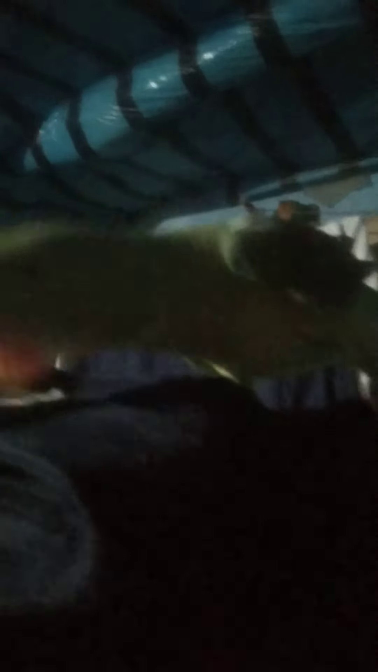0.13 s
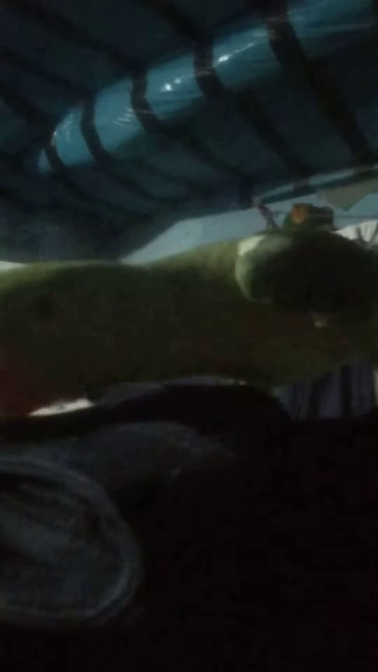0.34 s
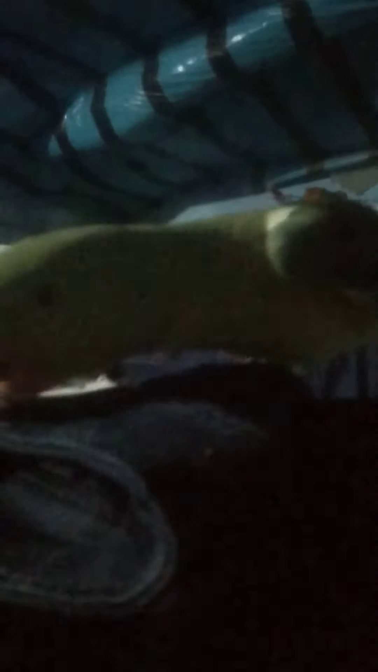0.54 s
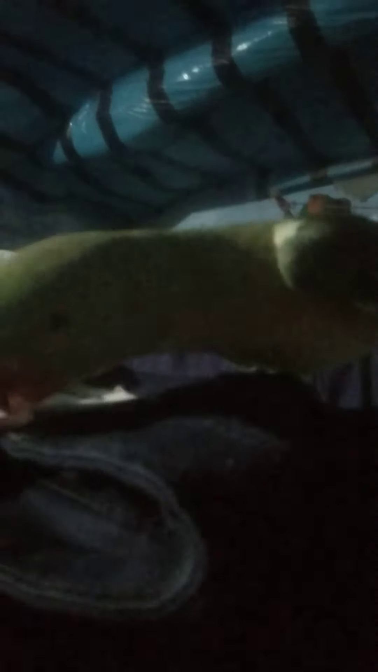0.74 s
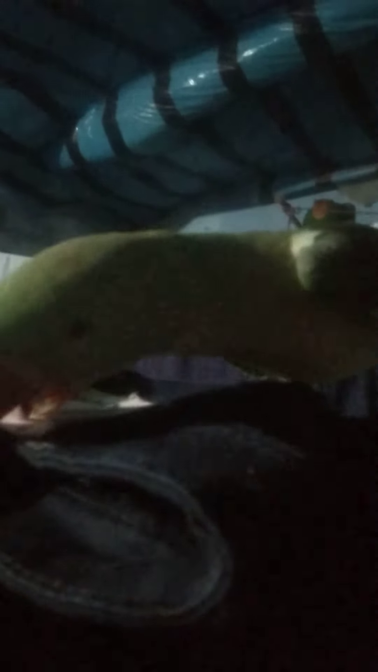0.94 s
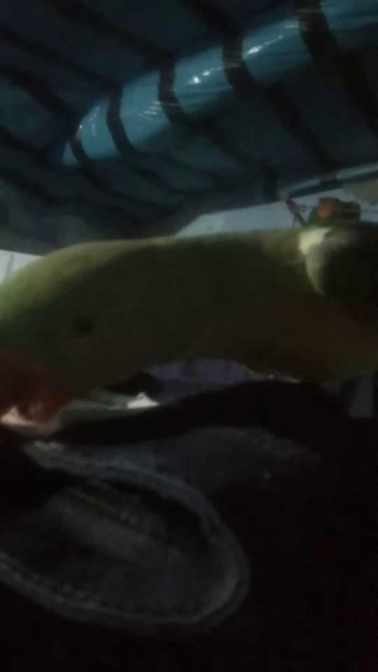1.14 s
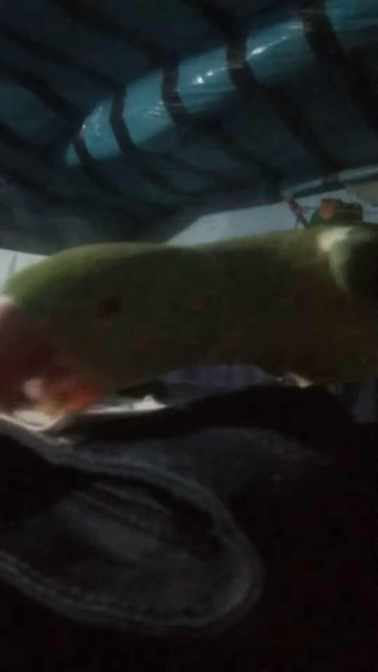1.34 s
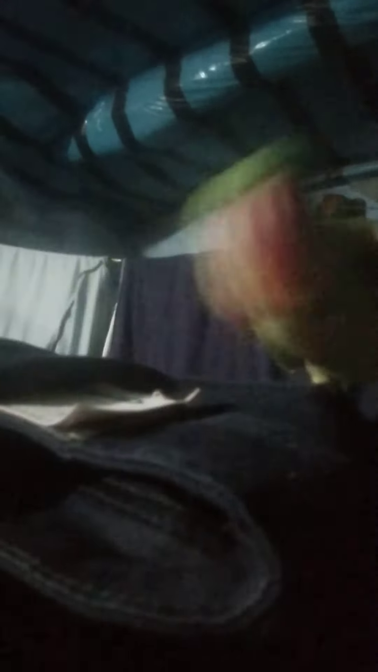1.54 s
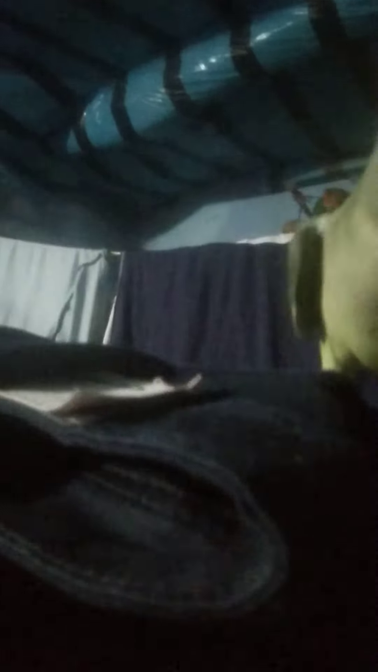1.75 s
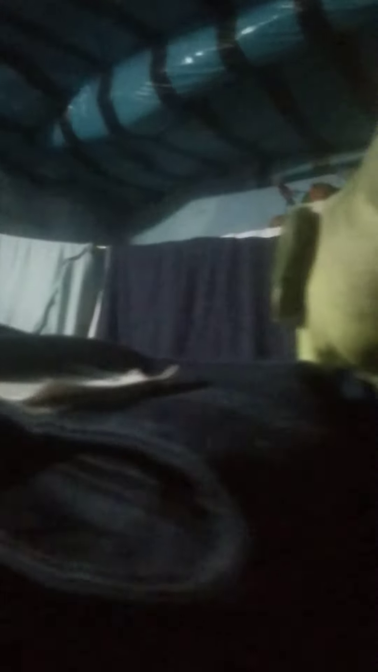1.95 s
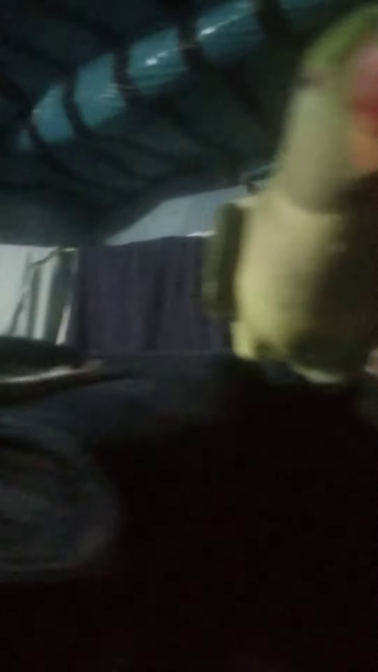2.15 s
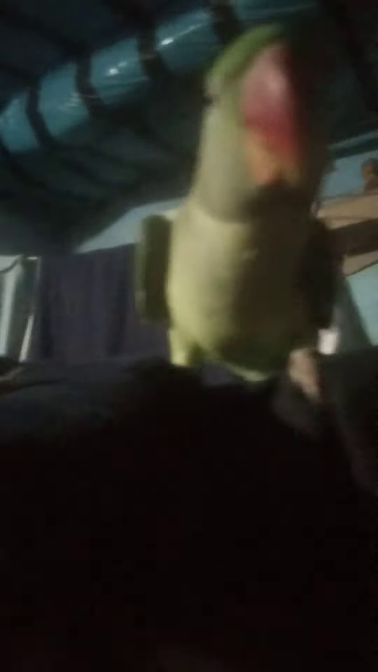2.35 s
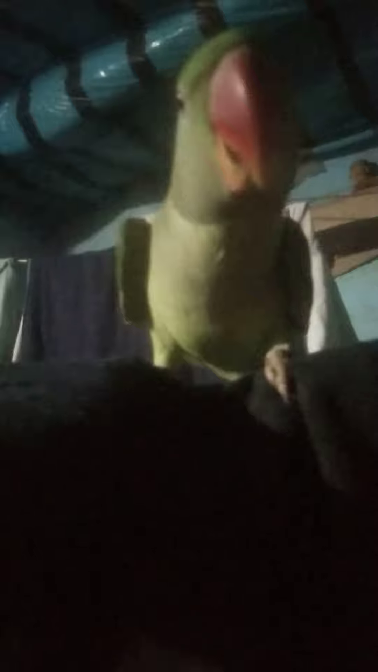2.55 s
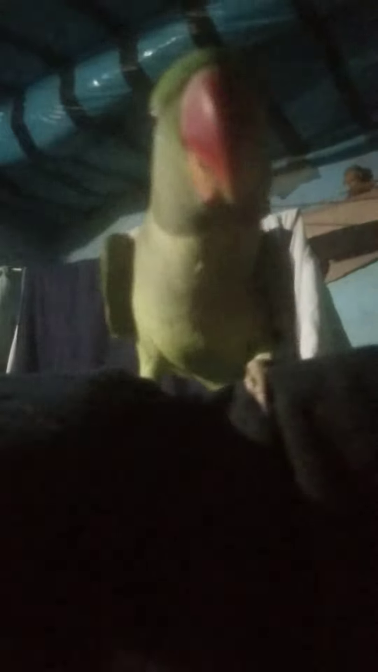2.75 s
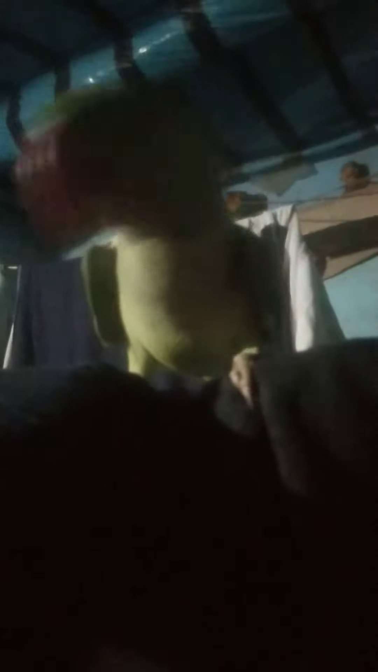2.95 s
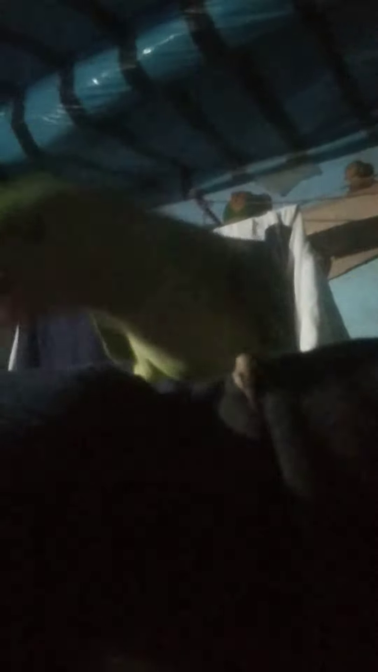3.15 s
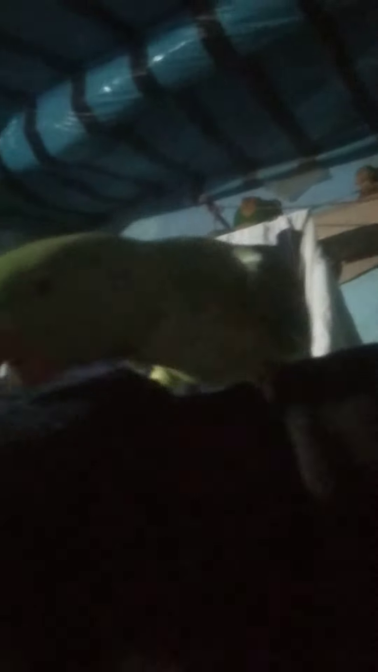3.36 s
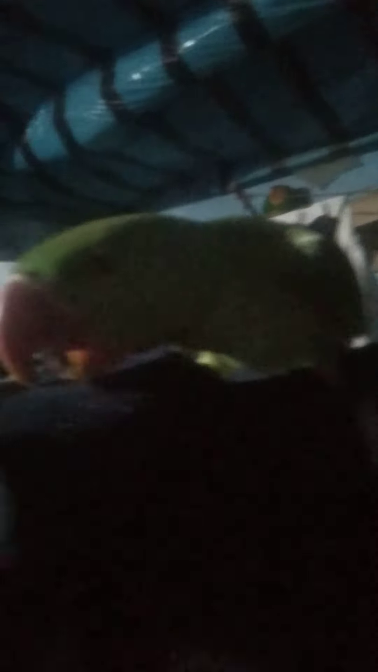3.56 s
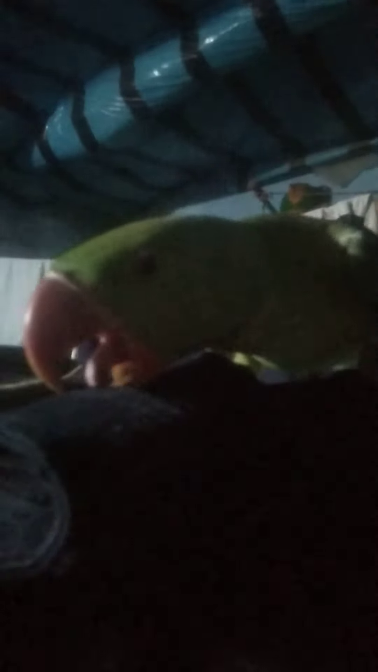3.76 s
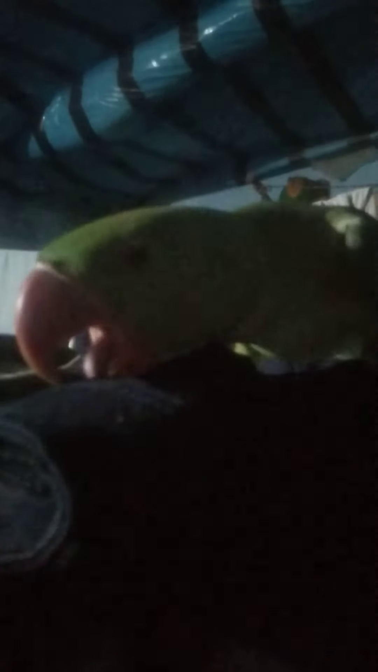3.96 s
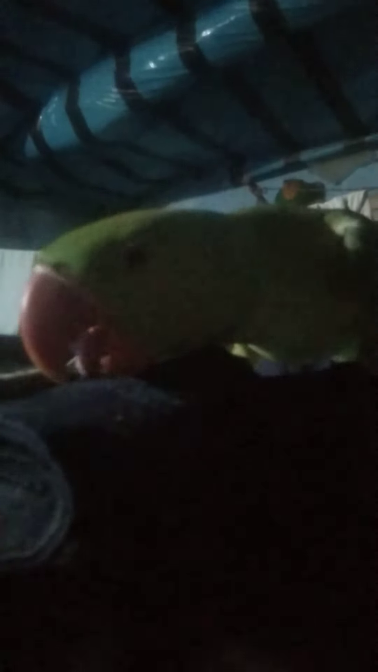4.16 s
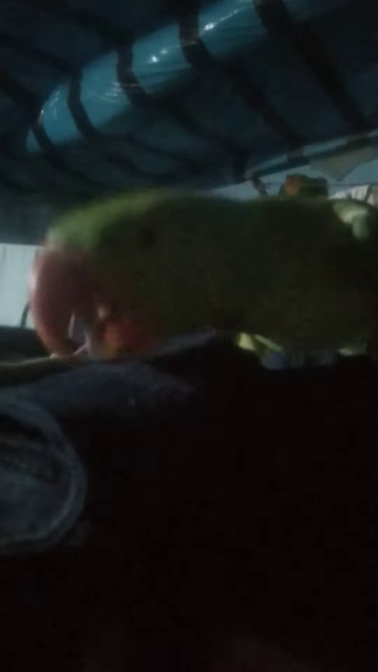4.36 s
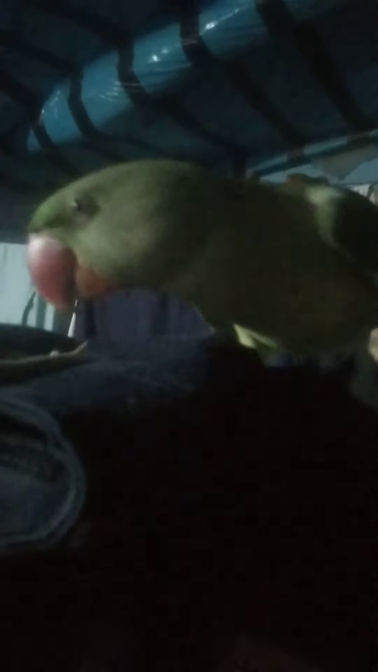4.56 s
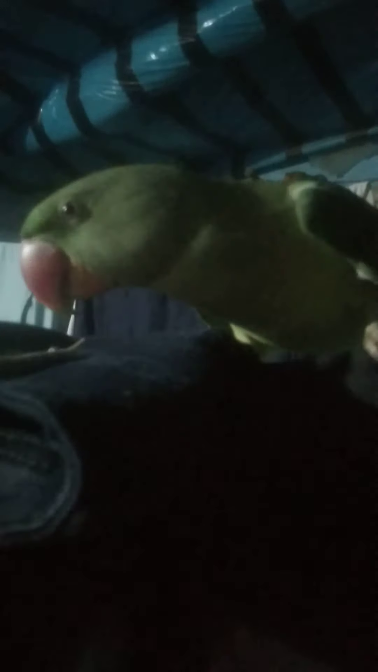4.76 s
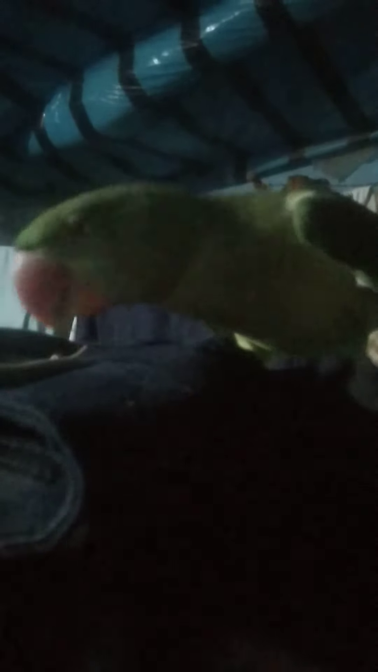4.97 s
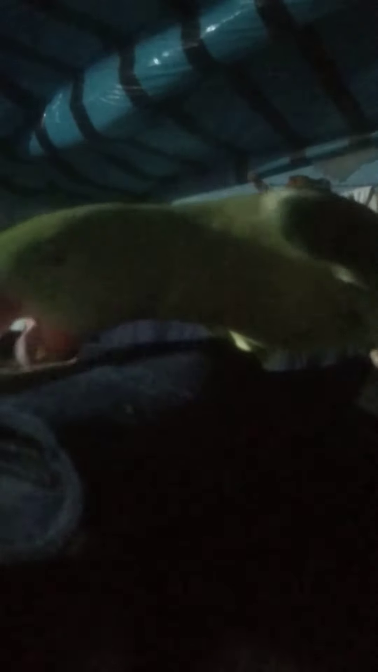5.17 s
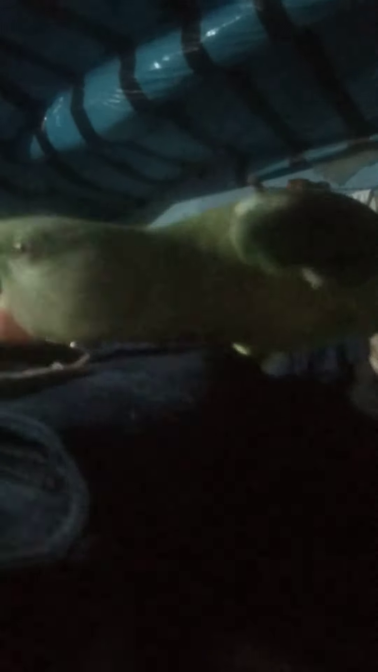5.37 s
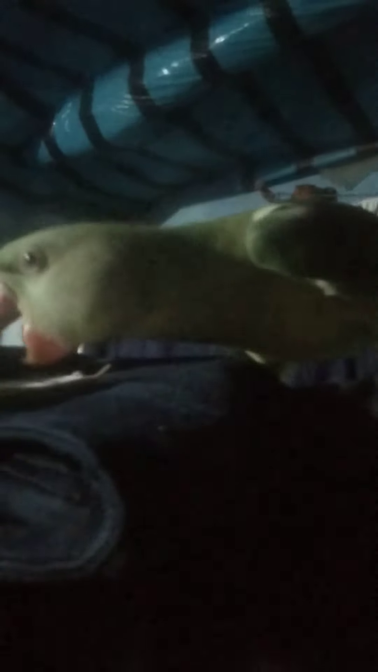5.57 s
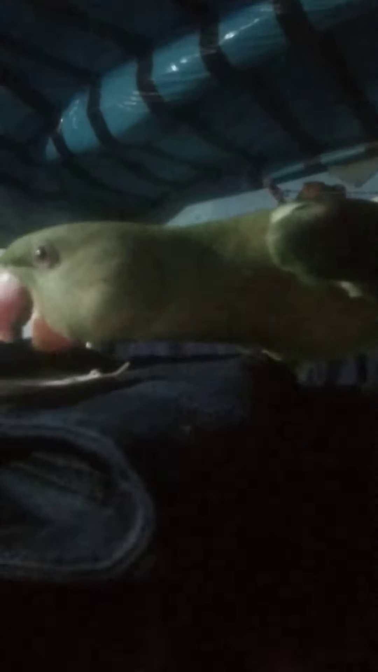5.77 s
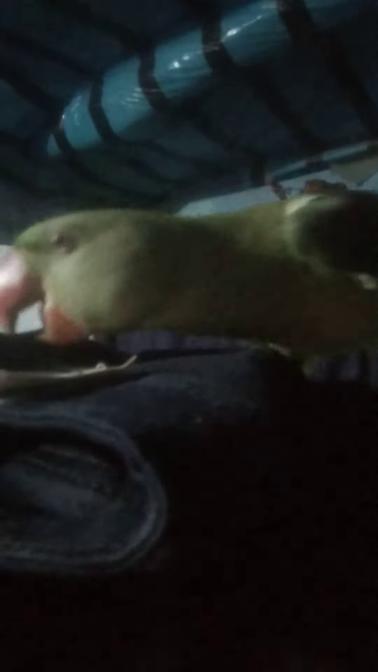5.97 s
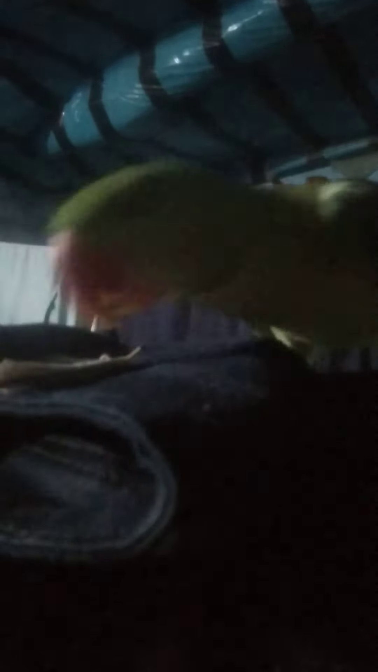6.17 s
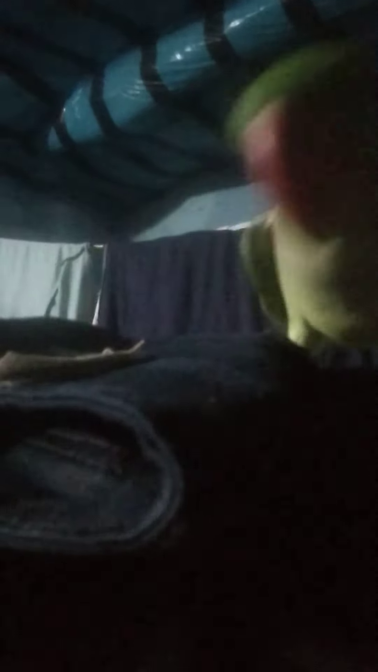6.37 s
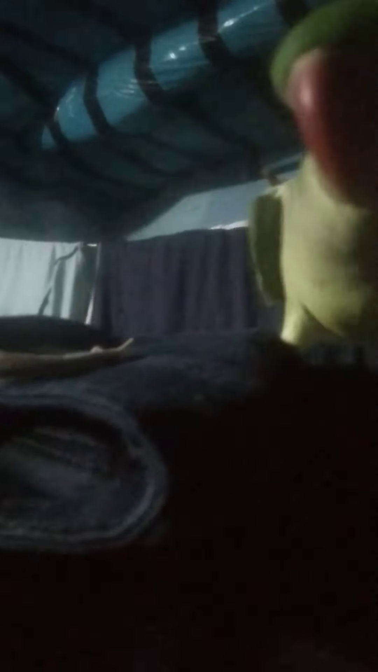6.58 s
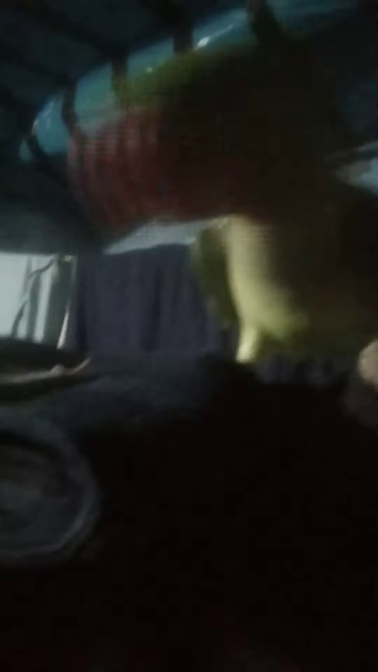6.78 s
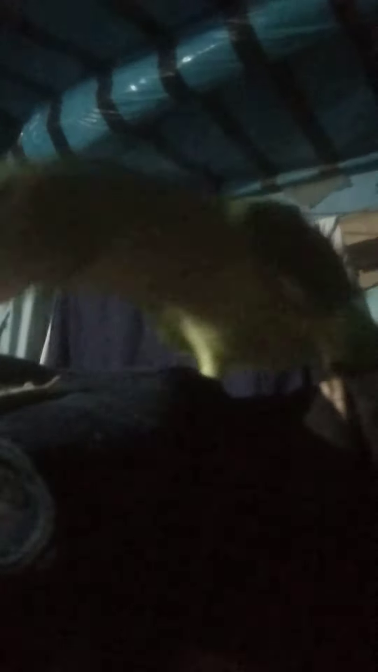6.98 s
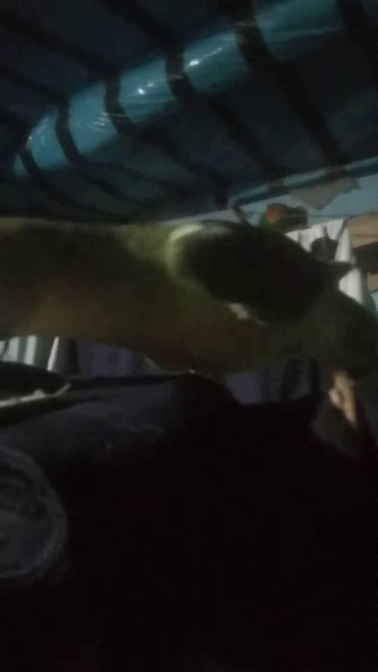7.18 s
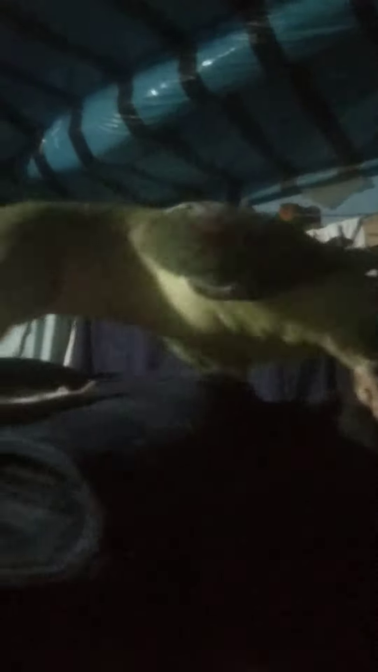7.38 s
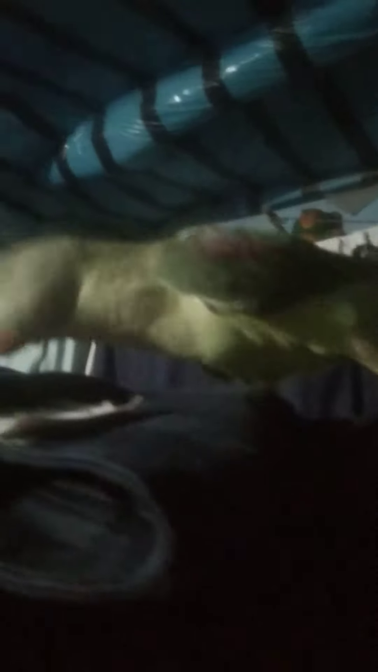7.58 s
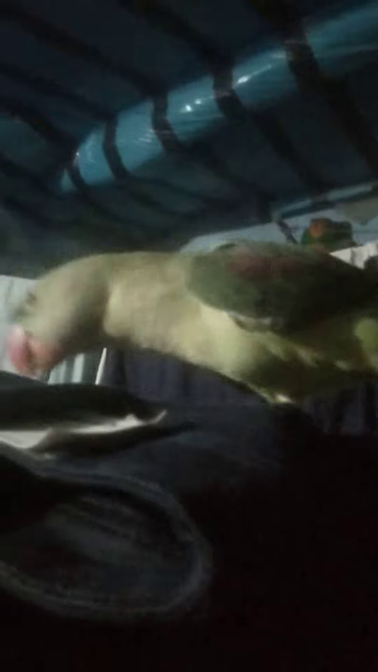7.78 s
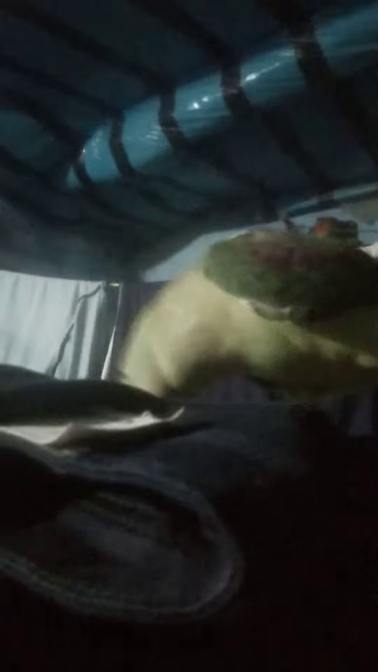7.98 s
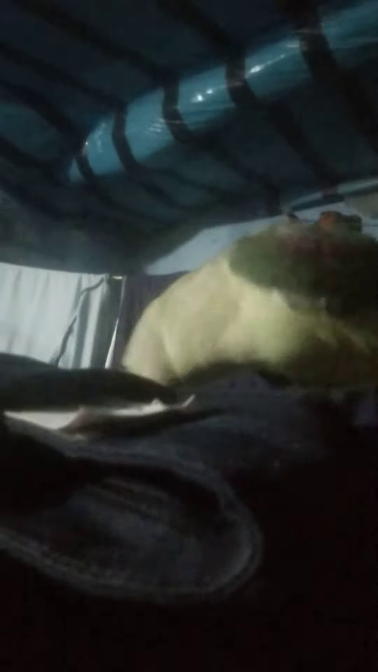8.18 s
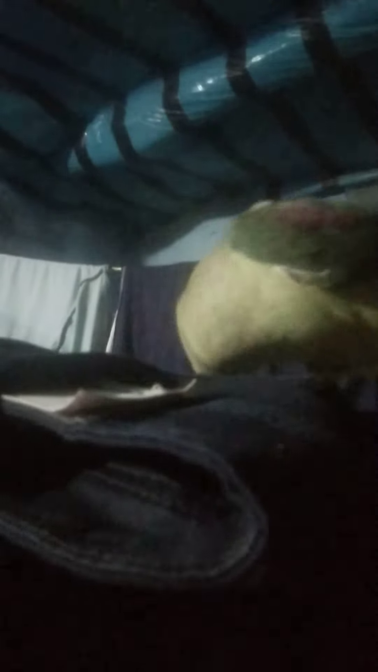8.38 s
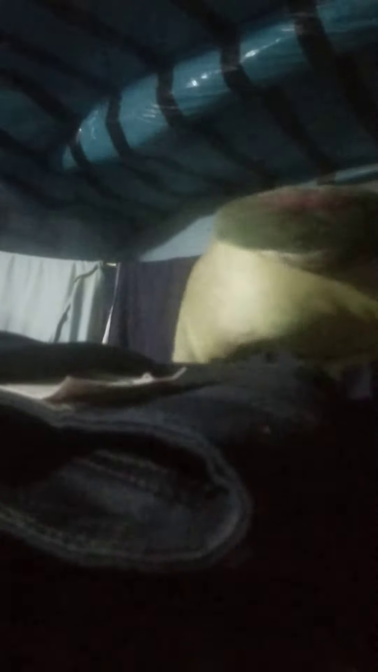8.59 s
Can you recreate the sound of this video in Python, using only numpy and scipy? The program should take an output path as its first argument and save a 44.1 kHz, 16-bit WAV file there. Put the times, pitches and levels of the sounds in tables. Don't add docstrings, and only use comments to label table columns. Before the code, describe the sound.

Quick dry beak clicks on hard plastic come about four or five a second with pauses between, in a small room with soft fan noise.

```python
import sys
import numpy as np
from scipy import signal
from scipy.io import wavfile
from scipy.ndimage import uniform_filter1d, minimum_filter1d

SR = 44100
rng = np.random.default_rng(int(sys.argv[2]) if len(sys.argv) > 2 else 0)


def invert_db(x):
    u = np.asarray(x, float) / 20
    return 10 ** u


def digitize_waveform(pressure):
    field = np.atleast_2d(pressure).T
    bounded = np.clip(field, -1, 1)
    quanta = np.round(bounded * 32767).astype(np.int16)
    wavfile.write(sys.argv[1], SR, quanta)


N = 381024


def unit_rms(x):
    return x / np.sqrt(np.mean(x ** 2) + 1e-20)


def unit_peak(x):
    return x / abs(signal.hilbert(x)).max()


def read_curve(points, hz):
    f, value = np.transpose(points)
    return np.interp(np.log(hz + 1), np.log(f + 1), value)


def add(mix, s, sound):
    part = mix[round(s * SR):][:len(sound)]
    part += sound[:len(part)]


def ring(x, hz, width_hz):
    pole = np.exp((2j * np.pi * hz - np.pi * width_hz) / SR)
    once = signal.lfilter([1], [1, -pole], x + 0j)
    return signal.lfilter([1], [1, -pole], once).real


def sharp_response(points, size=2048):
    hz = abs(np.fft.fftfreq(size, 1 / SR))
    log_gain = np.log(invert_db(read_curve(points, hz)))
    return np.fft.ifft(np.exp(np.conj(signal.hilbert(log_gain)))).real[:size // 2]


def slow_drift(fastest_hz, t):
    rates_hz = np.geomspace(.3, fastest_hz, num=20)
    return unit_rms(sum(np.sin(2 * np.pi * (f * t + rng.random())) for f in rates_hz))


# (frequency [Hz], level [dB per Hz])
AIR_SPECTRUM = [(30, -22), (50, -25.5), (70, -5.5), (150, -5), (300, -6), (450, -9.5), (2500, -9.5),
                (4200, -12.5), (5000, -17.5), (6900, -17), (8300, -32), (10000, -41), (12300, -46.5),
                (15000, -43)]
# (frequency [Hz], width [Hz], level above the air [dB])
HOUSING = [(537, 20, 5.5), (1040, 56, 7), (1800, 330, 4), (6050, 1070, 5)]
# (multiple of the blade rate [1], level [dB], waver [dB])
BLADE_TONES = [(0.999, -70, 2), (1.33, -75, 3), (2, -69.5, 6), (3, -77.5, 4), (4, -68.5, 5.5),
               (8, -75.5, -4.5)]


def fan():
    air_db, blade_hz, speed_waver = -53, 74.9, 0.0026
    frames, hz = N // 512 + 5, np.fft.rfftfreq(2048, 1 / SR)
    real, imaginary, patches = rng.standard_normal((frames, 1025, 3)).T
    patches = uniform_filter1d(uniform_filter1d(patches, 20, 0), 8, 1)
    patches_db = .7 * unit_rms(patches)
    housing_db = sum(db / (1 + (2 * (hz - f) / w) ** 2) for f, w, db in HOUSING)
    colour_db = read_curve(AIR_SPECTRUM, hz) + housing_db
    spectrum = (real + 1j * imaginary) * invert_db(colour_db[:, None] + patches_db)
    hiss = signal.istft(spectrum, nperseg=2048, noverlap=1536)[1][:N]
    sound = invert_db(air_db) * unit_rms(hiss)

    t = np.arange(N) / SR
    coarse = t[::441]
    speed = 1 + speed_waver * np.interp(t, coarse, slow_drift(1.5, coarse))
    turns = np.cumsum(blade_hz * speed) / SR
    for multiple, db, waver_db in BLADE_TONES:
        waver = np.interp(t, coarse, np.tanh(slow_drift(6.5, coarse)))
        tone = np.sin(2 * np.pi * (multiple * turns + rng.random()))
        sound += np.sqrt(2) * invert_db(db + waver_db * waver) * tone
    return sound


# (time [s], peak level [dB], first pitch [Hz], last pitch [Hz], length [ms])
FOOTSTEPS = [
    (1.245, -47, 160, 90, 16),
    (2.263, -44, 130, 70, 22),
    (7.157, -41, 166, 54, 25),
    (8.0, -61, 90, 55, 33),
]


def footsteps():
    out = np.zeros(N)
    for s, db, first_hz, last_hz, ms in FOOTSTEPS:
        u = np.arange(0, 1, 1000 / ms / SR)
        pitch_hz = last_hz + (first_hz - last_hz) * (1 - u) ** 2
        turns = np.cumsum(pitch_hz) / SR
        swell = np.sin(np.pi * np.sqrt(u))
        add(out, s, invert_db(db) * swell * np.sin(2 * np.pi * turns))
    return out


# (frequency [Hz], time to fall 60 dB [s])
ROOM_DECAY = [(300, 0.12), (1000, 0.1), (2500, 0.095), (4000, 0.077), (5300, 0.16), (6500, 0.082),
              (9000, 0.073)]


def room(level_db):
    wall_db, wall_s = -11, 0.01
    taps = np.zeros(SR // 4)
    at = np.arange(120, len(taps) - 12, 12)
    taps[at + rng.integers(0, 12, len(at))] = rng.choice([-1., 1.], len(at))
    hz, t, spectrum = signal.stft(taps, SR, nperseg=128)
    decay_db = -60 * t / read_curve(ROOM_DECAY, hz)[:, None]
    tail = signal.istft(spectrum * invert_db(decay_db), SR, nperseg=128)[1]
    tail /= np.linalg.norm(tail)
    tail[round(wall_s * SR) + rng.integers(-60, 60, 3)] += invert_db(wall_db) / np.sqrt(3)
    return invert_db(level_db) * tail


RING_WIDTHS = [450, 397, 584, 630, 660]


def slip(row, bite, grip, bout, grit, colours):
    s, ms, top_db, tilt_db = row
    low_db, upper_db, tip_db, crack_db, rim_db = grip
    start_s, rim_hz, fizz_db, room_db, damping = bout
    main_hz = bite[2]
    rings_hz = np.array([*bite[1:], rim_hz])
    octaves = np.log2(rings_hz[:-1] / main_hz)
    levels_db = np.array([low_db, 0, upper_db, tip_db]) + tilt_db * octaves
    levels_db = [*(top_db + levels_db - levels_db.max()), top_db + rim_db]

    t = np.arange(grit.shape[1]) / SR - .004
    late = (t + 0.00078) / (0.00037 * ms)
    push = np.exp(-.5 * np.where(late < 0, late, 1.05 * late) ** 2)
    catches = push * grit
    crack, fizz, shell = (signal.fftconvolve(catches, c[None], axes=1)[:, :len(t)] for c in colours)
    sound = invert_db(top_db + crack_db) * unit_peak(crack[0])
    sound += invert_db(top_db + fizz_db) * unit_peak(fizz[0])
    for drive, hz, width_hz, db in zip(shell[1:], rings_hz, RING_WIDTHS, levels_db):
        sound += invert_db(db) * unit_peak(ring(drive, hz, width_hz * damping))
    return sound


# (frequency [Hz], level [dB])
CRACK_SPECTRUM = [(500, -27.5), (900, 1.5), (2000, -9), (3000, 8), (4500, 6.5), (5800, -5.5), (7000, -22),
                  (8500, -26)]
# (frequency [Hz], level [dB])
FIZZ_SPECTRUM = [(6000, -40), (7700, 6), (9000, 1), (10500, -1), (12500, -7), (14800, -3), (15500, -3),
                 (17000, -30)]
# (frequency [Hz], level [dB])
SHELL_SPECTRUM = [(250, -75.5), (450, -17), (750, -5.5), (6900, 0), (7600, -6), (8600, -26.5), (11000, -81)]
# (time [s], low [Hz], main [Hz], upper [Hz], tip [Hz])
BITE_RINGS = [(0.309, 1020, 2465, 3510, 5750), (0.534, 880, 2120, 3320, 6800),
              (0.757, 770, 2330, 3560, 6500), (1.012, 890, 2300, 3250, 6500),
              (1.238, 885, 2170, 4130, 6480), (1.476, 1096, 2026, 4220, 6270),
              (3.335, 1040, 2510, 3740, 6800), (3.545, 1050, 2410, 3800, 6260),
              (3.759, 1166, 2550, 3930, 6050), (3.961, 1180, 2480, 3910, 6220),
              (4.167, 1085, 2620, 3810, 6300), (4.397, 1220, 2850, 3940, 6300),
              (5.262, 1050, 2340, 4360, 6250), (5.473, 875, 2080, 3500, 6150),
              (5.72, 1260, 2526, 3120, 6450), (5.973, 1220, 2380, 3700, 6370),
              (6.166, 1310, 2280, 3850, 6360), (7.209, 1207, 2230, 3880, 6970),
              (7.442, 1090, 2180, 3880, 6460), (7.662, 990, 1760, 3860, 6750),
              (7.746, 1360, 2690, 3950, 6700), (7.772, 1410, 2540, 3620, 6650)]
# (low [dB], upper [dB], tip [dB], crack [dB], rim [dB])
BITE_GRIPS = [(-14, -2, -31, -19, -26), (-5.5, -4, -25, -14, -24), (-4, -4.5, -12, -10.5, -21),
              (-9, -13, -18, -8.5, -24), (-11, -10, -17.5, -13, -33), (-8.5, -3.5, -15, -12, -2),
              (-18, -10, -12, -4, -12), (-7.5, 4.5, -10, -0.5, -18), (-7, 4.5, -8.5, -9, -23),
              (-9, 5, -7.5, -8.5, -16), (-13.5, 2.5, -11.5, -8, -21), (-23, 23.5, 11, -3, -26),
              (-13, -8, -11.5, -12, -16), (-3.5, -9, -17, -23, -16), (-9, -21, -18, -21.5, -16),
              (-14, -17, -16.5, -29, -17.5), (-5, -4, 5.5, -35, -42), (-2, -5.5, -15.5, -26, -25),
              (-0.5, 4, -20, -31, -32), (-3, 16, 6, -16, -21), (4, 20, 9, -18, -18),
              (2.5, 0, -12, -14, -28)]
# (start [s], rim ring [Hz], fizz level [dB], room level [dB], damping [factor])
HEAD_POSES = [
    (0.2, 4360, -35, -14, 1.08),
    (3.2, 4570, -45, -13.5, 1),
    (5.2, 5400, -41, -11, 0.94),
    (6.1, 5400, -45, -13, 1.4),
    (7.1, 4200, -35, -8.5, 1.17),
]
# (time [s], length # [ms], peak level [dB], tilt [dB per
BEAK_SLIPS = [(0.3106, 3.5, -21, -6), (0.315, 2.6, -4.5, 0.5), (0.3177, 5.7, -10.5, 0),
              (0.3216, 4.1, -14, 0), (0.5361, 3.2, -25, 3.5), (0.5439, 3.8, -19.5, 0.5),
              (0.5532, 3.1, -31, 1), (0.76, 3.2, -33, -2), (0.7626, 3.6, -21, 0.5), (0.771, 3.3, -21, 1.5),
              (1.0178, 4.2, -16, -0.5), (1.0266, 4.6, -25, -2), (1.2388, 8.7, -19.5, -1.5),
              (1.248, 2.5, -9.5, 0.5), (1.2577, 4.9, -29.5, 9.5), (1.4782, 5.4, -21.5, -1.5),
              (1.48, 2.5, -11.5, -1.5), (1.4926, 2.9, -16.5, -1.5),
              (3.3355, 2.6, -15.5, 1.5), (3.341, 3.7, -10, -2.5), (3.3492, 4.9, -29.5, 8),
                (3.547, 1.4, -29, 11), (3.554, 5.7, -20.5, -1), (3.56, 4.8, -28, -0.5),
                (3.7605, 0.73, -16, 3), (3.7673, 4.1, -8, -0.5), (3.773, 3.2, -20, 14),
                (3.9618, 1.9, -16.5, 5), (3.968, 3.2, -12, -1.5), (3.973, 2.4, -3.5, 1),
                (4.1697, 3.8, -23, -10), (4.1728, 6.1, -9.5, 3.5), (4.1761, 3.6, -5, 0),
                (4.1787, 3.2, -14.5, -5), (4.3989, 1.5, -10.5, 2), (4.403, 4.8, -13, 3.5),
                (4.4099, 5.9, -14, -1),
              (5.2626, 2.4, -15, -4.5), (5.2666, 7.3, -8.5, 1), (5.2754, 8.7, -25, 24),
               (5.4756, 3, -34, -16), (5.4787, 3.3, -21.5, 2), (5.486, 4.1, -35, 8), (5.7234, 2.1, -37, -2),
               (5.7364, 2.5, -13, 1), (5.745, 6.2, -28.5, 6), (5.9777, 4.4, -6.5, -0.5),
               (5.974, 3, -35, -6), (5.982, 2.5, -18.5, -1.5), (5.988, 6, -22, 9), (6.0064, 1.9, -15, -3.5),
               (6.162, 1.5, -36, 17), (6.167, 1.5, -31, 15), (6.1705, 2.3, -28, 22), (6.1803, 2.6, -31, -5),
               (6.1838, 1.4, -0.2, -0.5), (6.1875, 1.1, -20, -1.5), (6.193, 4.4, -32, -5),
               (6.1991, 2.5, -16.5, -2.5),
              (7.213, 4.1, -20, -1), (7.2163, 2.9, -16, 1), (7.2197, 1.9, -25, 8), (7.444, 3.3, -20, 0.5),
                (7.4502, 1.7, -40, 0), (7.663, 2.2, -36.5, -4), (7.673, 8.8, -43.5, 17),
                (7.7485, 2.3, -30.5, 0), (7.7575, 2.5, -42, 10), (7.7743, 5.7, -28, 1),
                (7.7812, 1.5, -34, 0), (7.7884, 2.5, -34, -6)]


def beak():
    out, shell = np.zeros(N), sharp_response(SHELL_SPECTRUM)
    crack = np.convolve(sharp_response(CRACK_SPECTRUM), shell)
    colours = crack, sharp_response(FIZZ_SPECTRUM), shell
    starts = np.array(BITE_RINGS)[:, 0] - .012
    pose_starts = np.array(HEAD_POSES)[:, 0]
    bouts = [HEAD_POSES[k - 1] for k in np.searchsorted(pose_starts, starts)]
    bites = np.zeros((len(BITE_RINGS), SR // 10))
    slips = BEAK_SLIPS
    grits = rng.standard_normal((len(slips), 6, 900))
    for row, grit in zip(slips, grits):
        k = np.searchsorted(starts, row[0] - .007) - 1
        sound = slip(row, BITE_RINGS[k], BITE_GRIPS[k], bouts[k], grit, colours)
        add(bites[k], row[0] - .004 - starts[k], sound)
    for s, bite, bout in zip(starts, bites, bouts):
        room_db = bout[3]
        add(out, s, bite)
        add(out, s, signal.fftconvolve(bite, room(room_db)))
    return out


def scene():
    return (beak() + footsteps() + fan())[None]


def band_limit(x):
    return signal.sosfilt(signal.butter(12, 15750, fs=SR, output="sos"), x)


def record(dry):
    needed_gain = np.minimum(.82 / (abs(dry) + 1e-9), 1)
    gain = uniform_filter1d(minimum_filter1d(needed_gain, size=89), size=88)
    return band_limit(gain * dry)


dry = scene()
out = record(dry)
digitize_waveform(out)
```